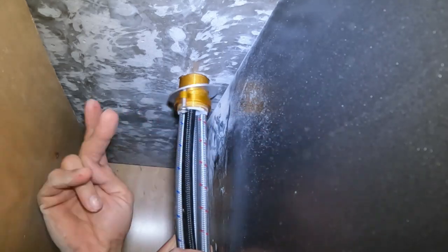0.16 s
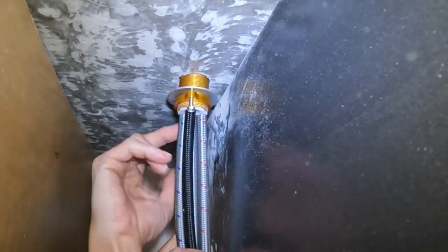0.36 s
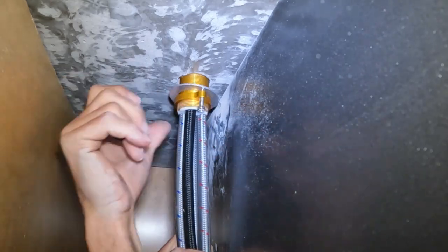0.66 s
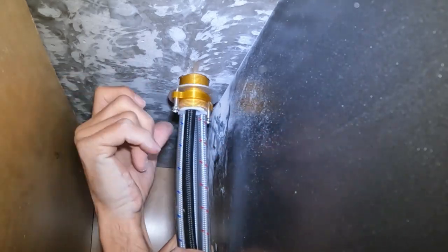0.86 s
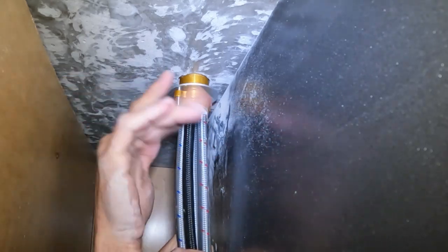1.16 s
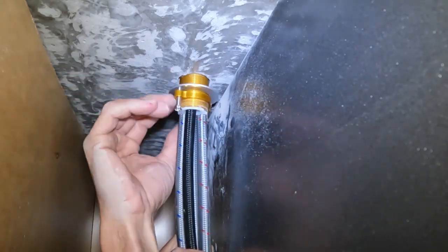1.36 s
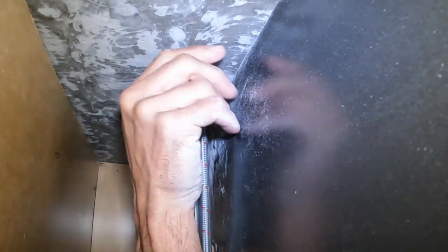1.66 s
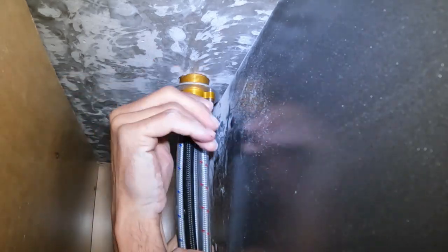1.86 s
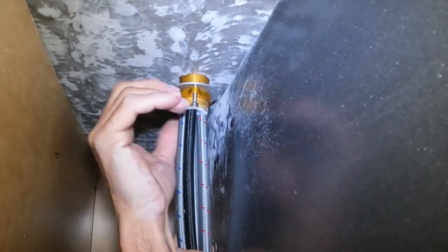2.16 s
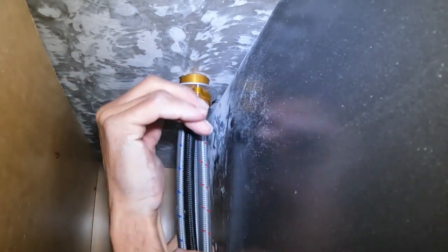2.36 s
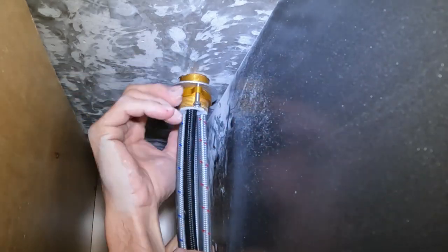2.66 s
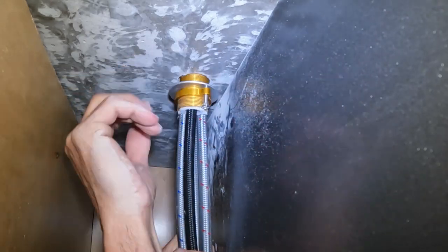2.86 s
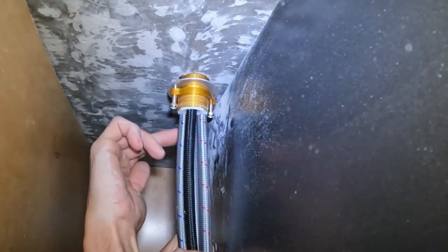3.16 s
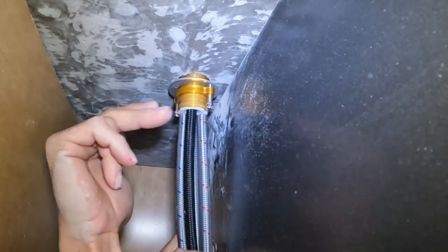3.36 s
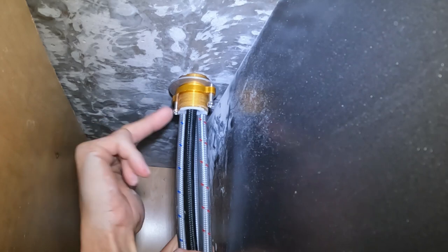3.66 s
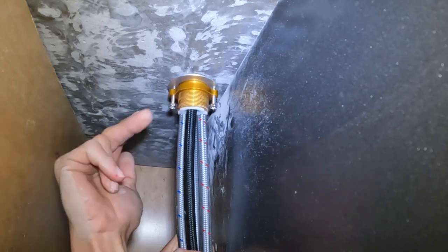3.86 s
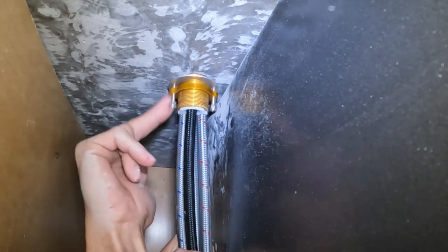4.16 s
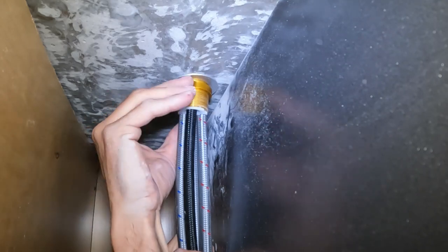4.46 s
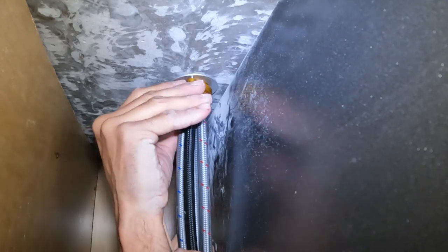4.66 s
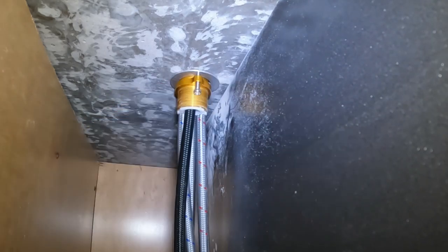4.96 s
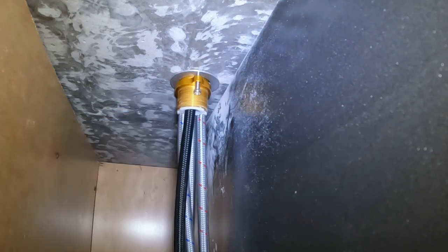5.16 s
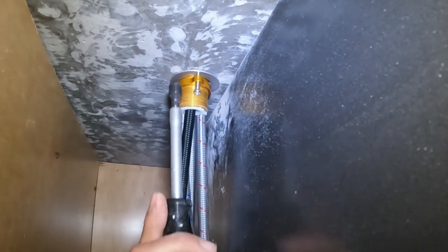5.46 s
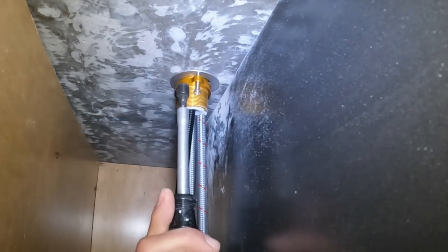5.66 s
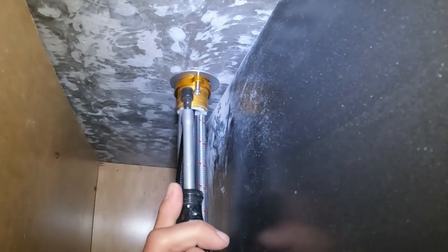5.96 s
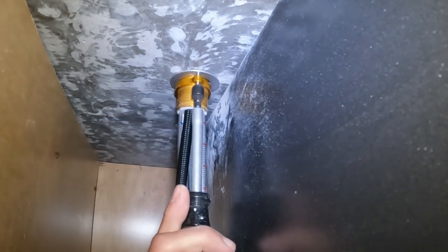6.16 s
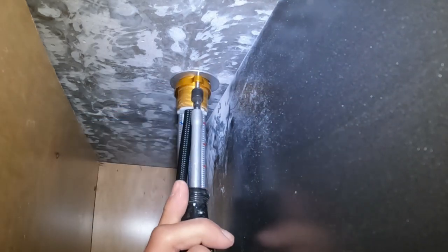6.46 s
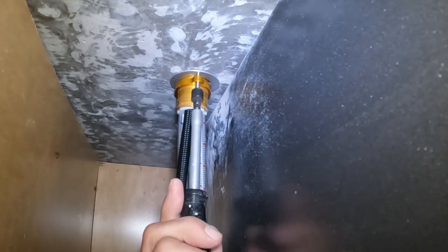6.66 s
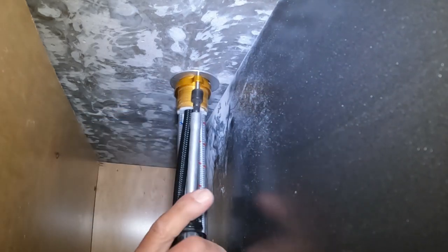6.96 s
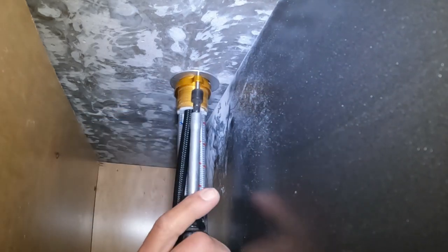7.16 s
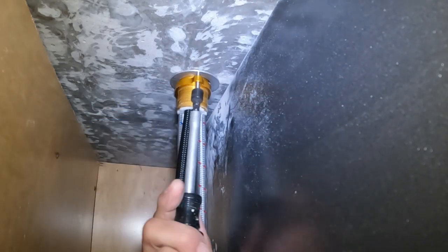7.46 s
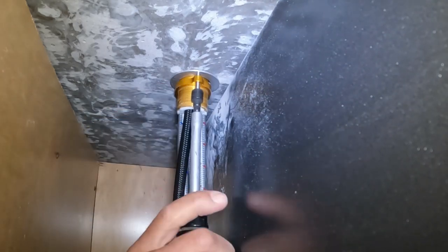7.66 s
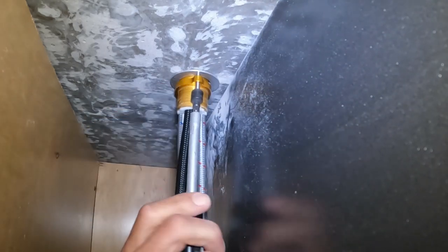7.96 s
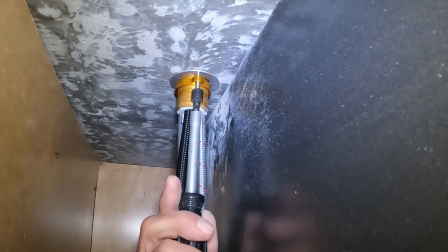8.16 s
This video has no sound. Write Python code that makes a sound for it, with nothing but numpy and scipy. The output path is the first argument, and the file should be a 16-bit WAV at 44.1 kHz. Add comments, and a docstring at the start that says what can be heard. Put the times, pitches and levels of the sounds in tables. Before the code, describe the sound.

Under a sink, close to a single microphone with very faint room noise. From 0.1 to about 4.4 seconds fingers flick a brass nut along its thread: irregular gritty strokes of roughly a tenth of a second, bright and thinly ringing, each starting fast and slowing. Sharp ticks of loose nut and washer punctuate them, with soft skin brushes on the hoses and small knuckle knocks near 2.3 to 2.6 and 3.1 seconds. The strokes thin out, leaving near quiet by 4.7. At about 4.85 an abrupt cut; a loud clack and thump at 4.95 begin the screwdriver's work. Its tip rubs and rasps continuously, duller and boomier through counter and cabinet, with knocks near 5.5, 5.9 and 6.4, a deep thump around 7.0, clustered rattling taps from 7.6 to 7.8, and strong hits at 7.8 and 8.1. Faint bright clinks and hiss ride above, rubbing to the end.

```python
"""Under a sink, fingers spin a brass nut up its thread in short gritty strokes, with small ticks of loose metal.
After a cut a screwdriver knocks and rubs on the nut's screws; the sound is then duller, louder and boomy,
as the cabinet and the counter carry it to a single microphone.
Noise friction and short bursts drive decaying resonances of nut, washer, sink, screw, tip, shaft and cabinet."""
import sys
import numpy as np
from scipy import signal
from scipy.io import wavfile
from scipy.ndimage import uniform_filter1d

SR = 44100
rng = np.random.default_rng(int(sys.argv[2]) if len(sys.argv) > 2 else 0)


def master(y):
    """Save y as 16-bit WAV."""
    cut = np.clip(np.atleast_2d(y).T, -1, 1)
    pcm = np.round(cut * 32767)  # scale
    wavfile.write(sys.argv[1], SR, pcm.astype(np.int16))


N = 366912
CUT_S = 4.84  # the nut gives way to the screwdriver
HARD_DB = -31  # a hard stroke, the reference for sink share and starting ticks
SEATED_S = 5.9  # from here on the tip sits in the screw head

# Finger flicks of the nut along the thread:
# start_s, grind_db (relative), rise_s (time to full speed), length_s
STROKES = [(0.113, -33, .01, 0.045), (0.157, -38, .002, .02), (0.168, -30.5, .045, 0.175),
           (0.49, -63, .035, 0.085), (0.569, -30.5, .03, 0.145), (0.788, -32, .032, 0.14),
           (1.091, -46, .003, 0.055), (1.124, -41.5, .012, 0.035), (1.225, -29, .01, 0.155),
           (1.36, -47, .001, 0.03), (1.418, -52, .001, .03), (1.464, -32, .035, 0.088),
           (1.631, -33, .01, 0.11), (1.69, -29, .006, 0.105), (1.829, -45, .001, 0.05),
           (1.872, -36, .004, 0.08), (1.966, -45, .002, 0.03), (2.041, -38.5, .015, 0.08),
           (2.125, -41, .006, 0.13), (2.246, -40, .001, 0.095), (2.328, -41, .001, 0.06),
           (2.377, -47, .001, .035), (2.485, -31.5, .028, 0.13), (2.719, -46, .001, 0.03),
           (2.742, -33.5, .001, .025), (2.759, -31.5, .02, 0.145), (3.031, -33, .002, 0.03),
           (3.053, -30, .012, 0.135), (3.356, -31, .004, 0.14), (3.581, -31, .025, 0.14),
           (3.746, -52, .002, 0.024), (3.81, -37, .001, 0.05), (3.834, -30.5, .008, 0.125),
           (4.032, -42, .003, 0.025), (4.242, -31, .012, 0.125), (4.465, -52, .001, 0.024),
           (4.604, -59, .002, 0.022)]


def gain_of(db):
    """Amplitude factor of a level in dB."""
    return 10 ** (np.asarray(db) / 20)


def evened(x):
    """Scales a signal to an RMS of 1."""
    return x / np.sqrt(np.mean(x ** 2) + 1e-20)


def curve_at(points, hz):
    """Reads a curve of (frequency, value) points along a log frequency axis."""
    point_hz, value = np.transpose(points)
    return np.interp(np.log(hz + 1), np.log(point_hz + 1), value)


def along(rows):
    """Columns of a time curve at every sample."""
    s, *columns = np.transpose(rows)
    return [np.interp(np.arange(N) / SR, s, column) for column in columns]


def add(mix, s, sound):
    """Adds a sound to the mix in place, starting at s seconds."""
    part = mix[round(s * SR):][:len(sound)]
    part += sound[:len(part)]


def cut_from(x, s, length):
    """A stretch of a signal, starting at s seconds."""
    return x[round(s * SR):][:length]


def colour(points):
    """Causal minimum-phase response of energy 1 with the given spectrum."""
    hz = abs(np.fft.fftfreq(8192, 1 / SR))
    log_gain = np.log(gain_of(np.maximum(curve_at(points, hz), -100)))
    spectrum = np.exp(np.conj(signal.hilbert(log_gain)))
    taps = np.fft.ifft(spectrum).real[:4096]
    return taps / np.linalg.norm(taps)


def rings(modes, hiss=None, hiss_db=0.):
    """Response of energy 1: decaying modes, wider ones dying sooner, over a broad colour."""
    t = np.arange(SR // 2) / SR
    taps = np.zeros(len(t))
    for k, (hz, width, db) in enumerate(modes):
        decay = width * np.exp(-np.pi * width * t)
        taps += (-1) ** k * gain_of(db) * decay * np.sin(2 * np.pi * hz * t)  # alternating sign
    taps = taps / np.linalg.norm(taps)
    if hiss is not None:
        add(taps, 0, gain_of(hiss_db) * colour(hiss))
    return taps / np.linalg.norm(taps)


def through(x, taps):
    """Plays a driving signal through a response."""
    return signal.oaconvolve(x, taps)[:N]


def resonate(x, hz, width):
    """Resonance of gain 1: shifts hz down to zero, smooths over the width in Hz, and shifts back."""
    turn = np.exp(2j * np.pi * hz * np.arange(len(x)) / SR)
    r = np.exp(-np.pi * width / SR)
    return 2 * (turn * signal.lfilter([1 - r], [1, -r], x / turn)).real


def grit(per_s, spread_db, smooth, flutter_db, flutter_s):
    """Friction: random catches of unequal size over smooth noise, fluttering in level."""
    caught = rng.random(N) < per_s / SR
    size = gain_of(spread_db * np.minimum(rng.exponential(1, N), 4)) * caught
    catches = evened(size * rng.standard_normal(N))
    span = max(round(flutter_s * SR), 2)
    wander = uniform_filter1d(uniform_filter1d(rng.standard_normal(N), span), span)
    rubbing = catches + smooth * rng.standard_normal(N)
    return evened(rubbing * gain_of(flutter_db * evened(wander)))


def burst(sound, db, t60, rise_s):
    """A noise or tone that rises briefly and dies away by 60 dB in t60 seconds."""
    t = np.arange(len(sound)) / SR
    return sound * gain_of(db - 60 * t / max(t60, .004)) * np.minimum(t / rise_s, 1)


def quiet_room():
    """Faint uneven room noise before the cut: grit in a broad colour."""
    # Colour: pitch_hz, density_db (dB per Hz, relative)
    room_colour = [(24, -67.5), (40, -15.5), (568, 7.5), (728, -4), (1730, -7), (1920, -17.5), (2170, -12),
                   (4130, -9), (15000, -32.5)]
    # Louder while the hand stays close: time_s, level_db
    room_level = [(0.0, -69), (0.3, -66), (0.41, -75), (0.47, -64), (1.0, -71), (1.4, -59), (2.25, -58),
                  (2.45, -67), (3.0, -62), (3.25, -73), (4.5, -73), (4.72, -66), (4.84, -72)]
    level = gain_of(along(room_level)[0]) * (np.arange(N) < CUT_S * SR)
    return level * through(grit(1500, 1.5, 8.7, 3.0, 0.009), colour(room_colour))


def grind_strokes(nut, sink, rough):
    """Each stroke grinds the thread, slows down, then fades out; a soft one gives the sink a larger share."""
    fall_db, slowing_power = 26, 1.2
    let_go_share = 0.2  # the last share of the length fades out
    sink_db, sink_follows = -39.5, 0.4
    for s, grind_db, rise_s, length_s in STROKES:
        t = np.arange(round(length_s * SR)) / SR
        slowing = np.clip((t - rise_s) / max(length_s - rise_s, .005), 0, 1) ** slowing_power
        let_go = np.minimum((1 - t / length_s) / let_go_share, 1)
        force = cut_from(rough, s, len(t)) * np.minimum(t / rise_s, 1) * let_go
        add(nut, s, force * gain_of(grind_db - 2.5 - fall_db * slowing))
        sink_level_db = sink_db + sink_follows * (grind_db - HARD_DB)
        add(sink, s, force * gain_of(sink_level_db - 0.62 * fall_db * slowing))  # slower fade


def thread_ticks(nut, sink):
    """The play in the thread closes with a tick as a stroke begins; loose nut and washer tick harder now and then."""
    # Harder ticks: start_s, level_db (relative)
    hard_ticks = [(0.128, -25), (0.185, -19), (0.2029, -20), (0.2614, -18), (0.5895, -22), (0.8012, -26),
                  (1.0922, -26), (1.49, -18), (1.6927, -18), (1.74, -27), (1.8301, -23), (1.8741, -16),
                  (2.283, -26), (2.3293, -25), (2.4983, -18), (3.0571, -17), (3.1073, -20), (3.6375, -20)]
    start_db, start_follows, gentle_db_per_s = -23.5, 0.6, 150  # a gentle start ticks softer
    ticks = list(hard_ticks)
    for s, grind_db, rise_s, _ in STROKES:
        ticks.append((s, start_db + start_follows * (grind_db - HARD_DB) - gentle_db_per_s * rise_s))
    for s, db in ticks:
        noise = rng.standard_normal(4000)
        add(nut, s, burst(noise, db - 8.0, 0.017, 0.00039))
        add(sink, s, burst(noise, db - 15, 0.017, 0.0018))


def hose_brushes(nut, rough):
    """Skin brushes the braided hoses: soft swells of grit through the nut's response."""
    # start_s, length_s, level_db (relative)
    brushes = [(0.92, 0.17, -70), (2.6, 0.12, -66), (2.91, 0.13, -59), (4.68, 0.17, -62)]
    for s, length_s, db in brushes:
        swell = signal.windows.hann(round(length_s * SR))
        add(nut, s, gain_of(db) * swell * cut_from(rough, s, len(swell)))


def knuckle_knocks(sink):
    """Knuckles knock on the sink: a short decaying tone, and a tiny push that rings the sink."""
    # start_s, level_db (relative), pitch_hz, t60_s
    knuckles = [(2.329, -34, 440, 0.05), (2.358, -34, 470, 0.05), (2.385, -35, 560, 0.05),
                (2.56, -34, 590, 0.05), (3.079, -20, 427, 0.05)]
    knock = np.zeros(N)
    for s, db, hz, t60 in knuckles:
        tone = np.sin(2 * np.pi * hz * np.arange(4000) / SR)
        add(knock, s, burst(tone, db, t60, 0.00047))
        add(sink, s, gain_of(db - 2.0) * signal.windows.hann(round(0.00055 * SR)))
    return knock


def spinning_nut():
    """Strokes and ticks shake nut and washer; a share passes into the sink, where strokes fade more slowly."""
    # Resonances: pitch_hz, width_hz, level_db (relative); the washer's are thin and long
    nut_modes, washer_modes, sink_modes = [(3365, 580, 10.5), (3840, 50, -15), (4790, 110, -16),
                                           (5630, 77, 9), (5560, 60, 19), (6490, 166, 6.5), (8400, 54, 4),
                                           (8800, 160, -18), (9400, 200, 4)], [(13254, 5, 0), (14720, 22, -14)], [(301.6, 36, -5.5),
                                                                        (414.7, 33.4, -0.5), (590, 26, 2),
                                                                        (678, 37, -2.5), (900, 30, -6),
                                                                        (1195, 26, -3.5), (1437, 39, -3),
                                                                        (1925, 28, -1), (2470, 55, -19.5),
                                                                        (2740, 110, -9)]
    # Colour between the rings: pitch_hz, density_db (dB per Hz, relative)
    nut_hiss, sink_hiss = [(1500, -40), (2900, -11.5), (3600, 6.5), (6000, 1), (9500, -4), (11500, -10),
                           (15300, -12), (16500, -46)], [(24, -54.5), (40, -39), (580, 0.5), (733, -2.5), (1710, -17.5),
                                             (1880, 4.5), (2130, -26), (3000, -69), (3900, -52),
                                             (6600, -120)]
    rough = grit(2300, 4.2, 0.85, 2.2, 0.007)
    nut, sink = np.zeros((2, N))
    grind_strokes(nut, sink, rough)
    thread_ticks(nut, sink)
    hose_brushes(nut, rough)
    knock = knuckle_knocks(sink)
    washer_sound = gain_of(-23.0) * through(nut, rings(washer_modes))
    nut_sound = through(nut, rings(nut_modes, nut_hiss, 10.6))
    sink_sound = through(sink, rings(sink_modes, sink_hiss, -3.5))
    return knock + washer_sound + nut_sound + sink_sound


def handling():
    """Force on screw, tip, shaft and cabinet: a steady grip with scrapes swelling out of it; and a faint hiss level."""
    # The hand grips and turns the tool: time_s, rasp_db, push_db (on the cabinet);
    # last column fizz_db: level of the faint treble hiss, on its own curve (all relative)
    grip_and_fizz = [(4.85, -48, -39, -70), (4.93, -36, -36, -65), (5.05, -39, -40, -61),
                     (5.18, -43, -39, -71), (5.33, -42, -40, -53), (5.5, -41, -36, -70),
                     (5.64, -36, -33, -66), (5.78, -44, -30, -73), (5.83, -48, -41, -73),
                     (6.08, -44, -40, -69), (6.3, -54, -46, -82), (6.52, -50, -36, -82),
                     (6.62, -50, -36, -63), (6.76, -48, -41, -65), (6.97, -38, -35, -57),
                     (7.12, -43, -40, -73), (7.22, -42, -40, -74), (7.38, -39, -39, -58),
                     (7.5, -41, -37, -63), (7.72, -35, -30, -57), (7.93, -49, -37, -67),
                     (8.32, -46, -39, -66)]
    # The tool slips: start_s, length_s, rasp_db, tip_db (above rasp), push_db (all relative)
    scrapes = [(4.95, 0.15, -35, -2, -30), (5.105, 0.066, -37.5, 5, -40), (5.259, 0.12, -43, -8, -30),
               (5.53, 0.22, -39, 2, -30), (5.915, 0.095, -30, -15, -24.5), (6.025, 0.07, -37, -17, -38),
               (6.095, 0.135, -37, -20, -42), (6.383, 0.091, -31, -6, -36), (6.448, 0.06, -40, -16, -25.5),
               (6.6, 0.12, -52, 0, -43), (6.76, 0.14, -44.5, -6, -35), (6.94, 0.085, -38, -3, -27),
               (7.004, 0.13, -40, -8, -27.5), (7.22, 0.23, -40, -4, -38), (7.382, 0.11, -41, -3, -38),
               (7.505, 0.07, -37, -18, -36), (7.6, 0.3, -44.5, -2, -32.5), (7.819, 0.08, -37, -22, -25),
               (7.99, 0.07, -43, -16, -33), (8.112, 0.08, -38, -14, -19), (8.236, 0.12, -43.5, -10, -36)]
    unseated = slice(0, round(SEATED_S * SR))
    rasp_db, push_db, fizz_db = along(grip_and_fizz)
    tip_db = -49 + 1.2 * (rasp_db + 42)  # the tip hisses with the rasp, more steeply
    shaft_db = -14 + (rasp_db + push_db) / 2  # the shaft hums with rasp and push
    power = gain_of(np.array([rasp_db, tip_db, shaft_db, push_db, fizz_db]) - 3.0) ** 2
    power[1, unseated] *= gain_of(3) ** 2  # the loose tip hisses more
    for s, length_s, rasp_db, tip_db, push_db in scrapes:
        swell = signal.windows.tukey(round(length_s * SR), .7) ** 2
        shaft_db = rasp_db - 2 - 0.7 * (tip_db + 10)  # rings less when the scrape stays bright on the tip
        for part, part_db in zip(power, [rasp_db, rasp_db + tip_db, shaft_db, push_db]):
            add(part, s, gain_of(part_db) ** 2 * swell)
    power[2, unseated] *= gain_of(-3) ** 2  # and the shaft rings less
    fade_in = np.clip((np.arange(N) / SR - CUT_S) / 0.033, 0, 1) ** 2
    return np.sqrt(power) * fade_in


def metal_taps(out, screw, tip, shaft):
    """The tip strikes metal: a burst shakes screw, tip and seated shaft, and the spot that is hit favours one band."""
    # start_s, level_db (relative), centre_hz
    taps = [(4.9488, -10.5, 3790), (5.1253, -29, 3840), (5.2397, -21.5, 4200), (5.3125, -24, 1920),
            (5.4162, -30, 2280), (5.478, -13.5, 2200), (5.6252, -25, 2300), (5.9193, -14, 1640),
            (5.95, -21.5, 1810), (6.0297, -16, 2200), (6.183, -26, 2280), (6.3665, -39, 1740),
            (6.386, -9.5, 2100), (6.4145, -13.5, 2500), (6.4366, -16, 2100), (6.9586, -25.5, 1700),
            (7.012, -25, 2160), (7.1008, -28, 2800), (7.1432, -23, 2640), (7.6097, -22.5, 2630),
            (7.6637, -21, 2300), (7.6836, -19, 2880), (7.7099, -20, 2920), (7.7432, -20.5, 2230),
            (7.7693, -18, 2700), (7.8282, -9, 2070), (8.018, -34, 1810), (8.1171, -12.5, 2330)]
    for s, db, hz in taps:
        t60 = 0.065 + 0.0012 * db  # softer taps die sooner
        shake = burst(rng.standard_normal(5000), db - 3.5, t60, 0.0006)
        add(screw, s, gain_of(-2.0) * shake)
        add(tip, s, gain_of(-7.0) * shake)
        add(shaft, s, gain_of(-6) * (s > SEATED_S) * shake)
        add(out, s, 7.0 * resonate(resonate(shake, hz, 560.0), hz, 560.0))


def cabinet_thumps(out, boom):
    """A push reaches the cabinet: the nearest panel sounds one tone, a burst shakes all panels."""
    # start_s, level_db (relative), pitch_hz
    thumps = [(4.95, -5.5, 285.5), (5.238, -26, 214), (5.477, -9, 321), (5.641, -23, 293.6),
              (5.921, -5, 295), (6.389, -22, 288), (6.465, -13.5, 285), (6.797, -28, 310),
              (6.962, -25, 205), (7.025, -6.5, 284), (7.316, -22, 221.6), (7.531, -22, 283),
              (7.604, -21, 296.5), (7.777, -15, 287), (7.83, -9, 208.5), (7.981, -30, 182),
              (8.121, -5.5, 226)]
    t = np.arange(12000) / SR
    for s, db, hz in thumps:
        add(out, s, burst(np.sin(2 * np.pi * hz * t), db - 0.5, 0.12, 0.0032))
        add(boom, s, burst(rng.standard_normal(3000), db - 4.5, 0.044, 0.00058))


def bright_clinks(out, fizz):
    """Thin bright clinks: short noise bursts through two broad treble resonances."""
    # start_s, level_db (relative)
    clinks = [(5.241, -22.5), (5.4176, -29), (5.6795, -22), (5.9174, -37), (6.029, -31), (6.384, -34),
              (7.1433, -35), (7.4363, -26), (7.7438, -36), (7.77, -25), (7.829, -26)]
    for s, db in clinks:
        shake = burst(rng.standard_normal(3000), db - 15.5, 0.04, 0.00018)
        add(fizz, s, shake)
        add(out, s, 2.3 * resonate(resonate(shake, 6200.0, 3600.0), 5400.0, 3600.0))


def screwdriver():
    """Rubbing drives screw, tip, shaft and cabinet, under a faint treble hiss; each blow adds its own short ring."""
    # Resonances: pitch_hz, width_hz, level_db (relative)
    screw_modes, tip_modes = [(1910, 26, -63), (2200, 20, -70), (2226, 200, 32), (2384, 65, 25),
                              (2670, 42, 23), (2930, 28, 27)], [(3652, 180, 4.5), (3830, 105, 8.5), (4840, 540, -9),
                                             (5700, 90, -4.5)]
    shaft_modes, cabinet_modes = [(754, 40, -13), (942, 22, 0), (987, 21, 1), (1140, 22, -12)], [(81, 58, -14.5), (111, 16, -16), (145, 34, -7),
                                                 (214.5, 18, 1), (253.7, 27.4, -3), (283, 29.3, -2),
                                                 (332.6, 37, -3), (436, 50, -11), (594, 53, -14)]
    # Colours of rasp, tip hiss and faint treble hiss: pitch_hz, density_db (dB per Hz, relative)
    rasp_colour, bright_colour, fizz_colour = [(300, -16.5), (450, -7), (850, -10.5), (1300, -5),
                                               (2300, -2.5), (3100, -3), (4000, -41)], [(2500, -30.5), (3300, 8.5), (4500, -1.5),
                                                             (6000, -8), (8200, -19), (9100, -44)], [(7500, -22), (9100, -24),
                                                                             (10000, -11), (11500, -7),
                                                                             (12500, -6), (13600, -30)]
    on_screw, on_tip, on_shaft, on_cabinet, fizz_level = handling()
    screw = on_screw * grit(1500, 1.2, 1.57, 1.48, 0.019)
    tip = on_tip * grit(1500, 2.9, 1.6, 1.2, 0.0052)
    fizz = gain_of(-2.5) * fizz_level * grit(710, 4.3, 1.9, 1.8, .01)
    shaft = on_shaft * grit(770, 3.7, 1.96, 2.3, 0.0071)
    boom = on_cabinet * grit(200, 1.9, 1.05, 1.75, 0.037)
    out = np.zeros(N)
    metal_taps(out, screw, tip, shaft)
    cabinet_thumps(out, boom)
    bright_clinks(out, fizz)
    out += through(screw, rings(screw_modes, rasp_colour, 5.5))
    out += through(tip, rings(tip_modes, bright_colour, 4.6))
    out += through(shaft, rings(shaft_modes))
    out += through(boom, rings(cabinet_modes))
    out += through(fizz, colour(fizz_colour))
    return signal.sosfilt(signal.butter(12, 13300, fs=SR, output="sos"), out)  # the top is lost after the cut


def scene():
    """One microphone; a phase-scrambled side signal makes the channels differ faintly, most in the treble."""
    # pitch_hz, side_db (relative to mid)
    apart = [(60, -40.5), (180, -56), (550, -56), (1650, -50), (4970, -43), (15000, -22)]
    mid = quiet_room() + spinning_nut() + screwdriver()
    hz, _, bins = signal.stft(mid, SR, nperseg=256)
    turn = np.exp(2j * np.pi * rng.random(bins.shape))
    side_bins = bins * turn * gain_of(curve_at(apart, hz))[:, None]
    side = signal.istft(side_bins, SR, nperseg=256)[1][:N]
    return np.array([mid + side, mid - side])


def record(dry):
    """The microphone drops the deepest bass; soft ceiling, then the band limit."""
    thin = signal.sosfilt(signal.butter(2, 86, "high", fs=SR, output="sos"), dry)
    held = 1.462 * np.tanh(thin / 1.172)
    band_limit = signal.firwin(301, 16050, window=("kaiser", 9), fs=SR)
    return signal.oaconvolve(held, band_limit[None], "same")


dry = scene()
out = record(dry)
master(out)
```